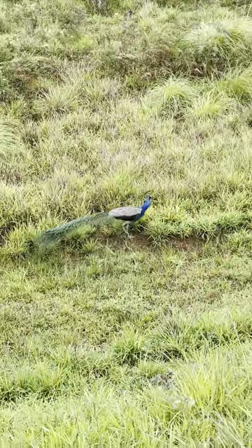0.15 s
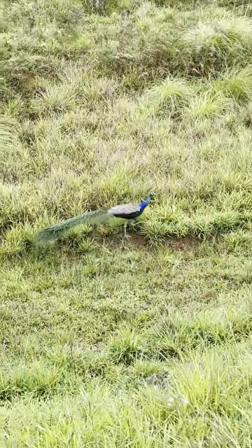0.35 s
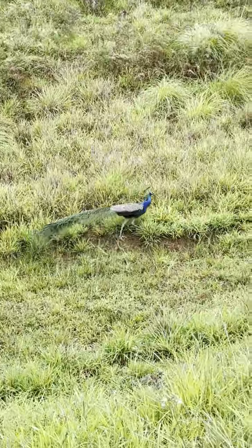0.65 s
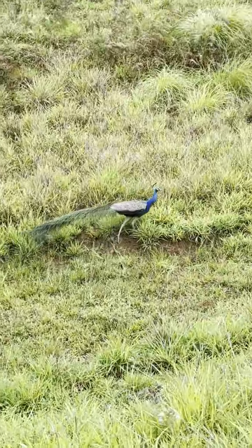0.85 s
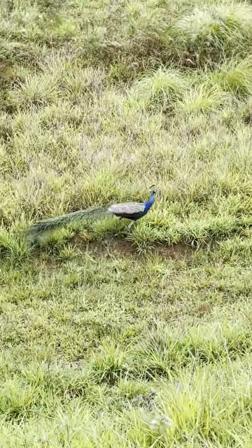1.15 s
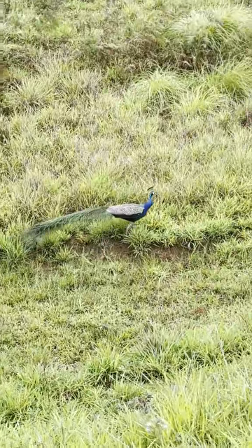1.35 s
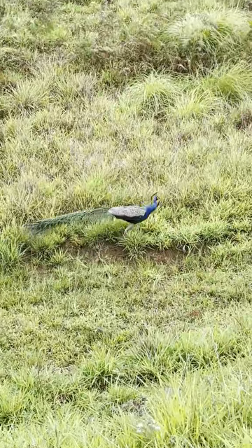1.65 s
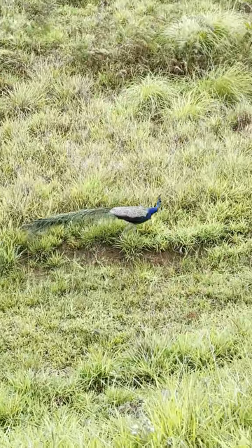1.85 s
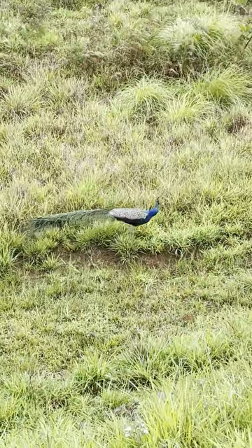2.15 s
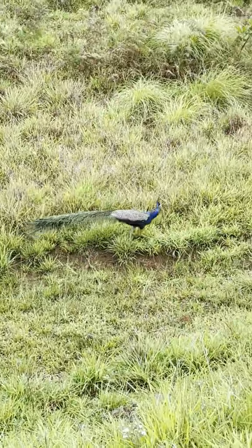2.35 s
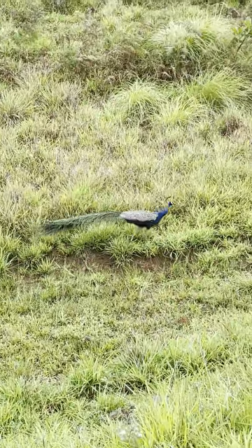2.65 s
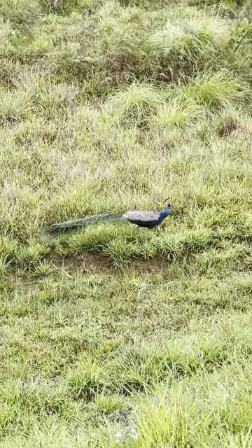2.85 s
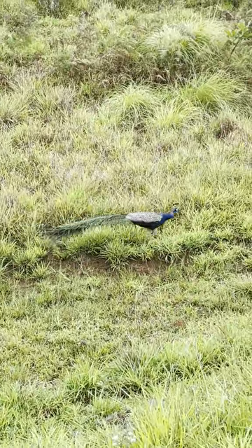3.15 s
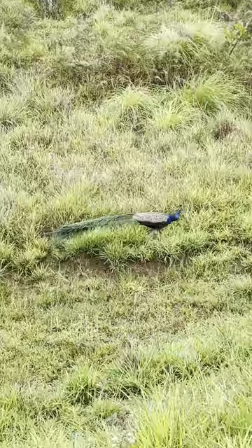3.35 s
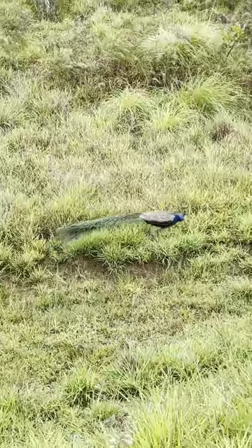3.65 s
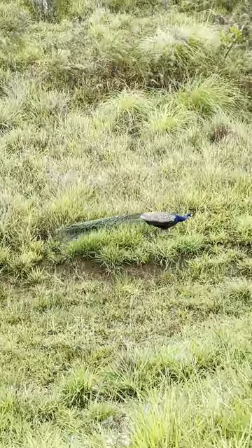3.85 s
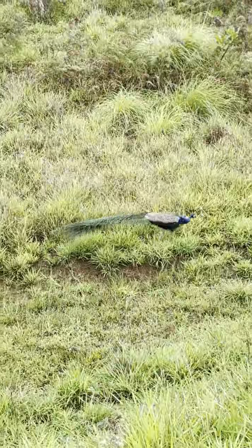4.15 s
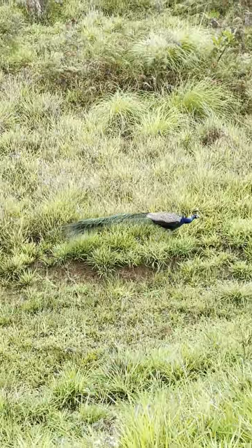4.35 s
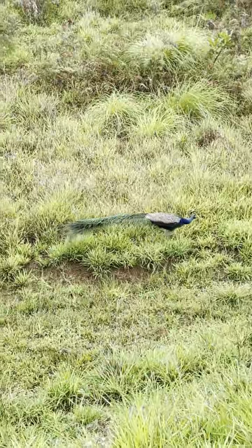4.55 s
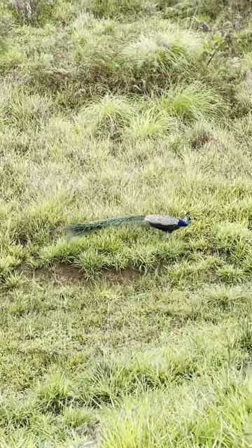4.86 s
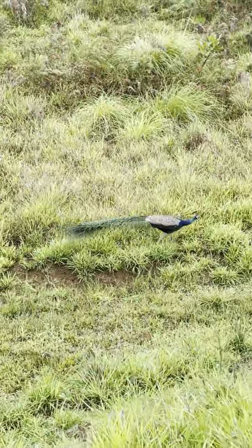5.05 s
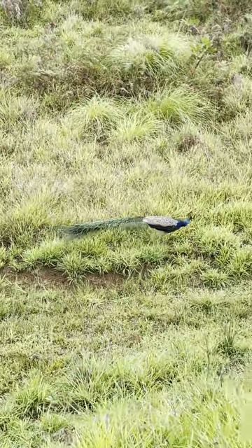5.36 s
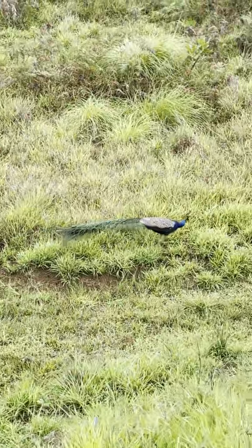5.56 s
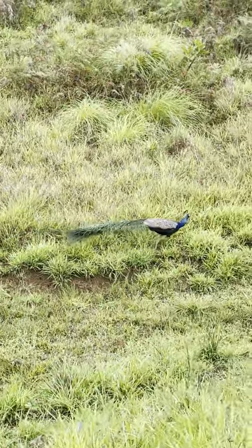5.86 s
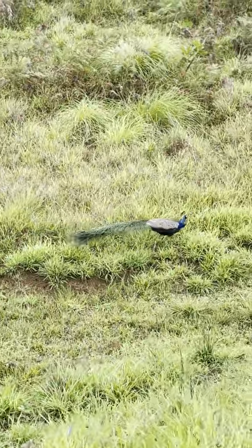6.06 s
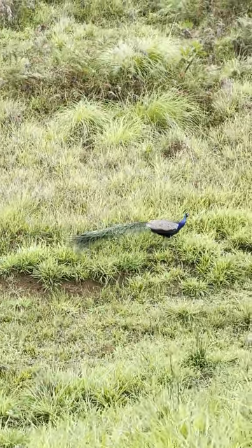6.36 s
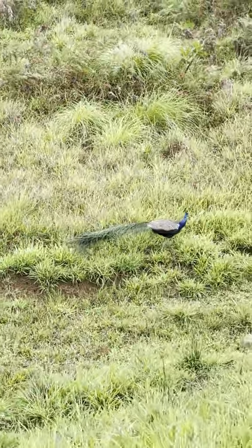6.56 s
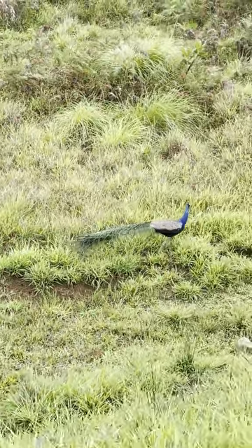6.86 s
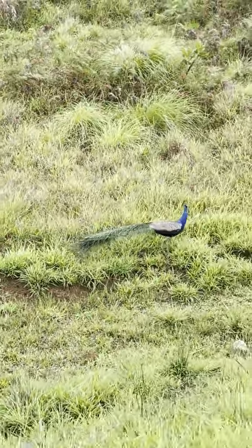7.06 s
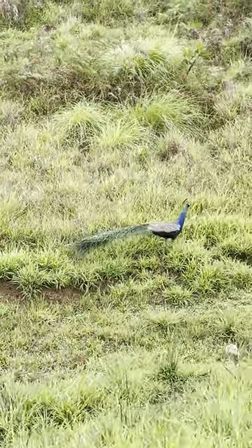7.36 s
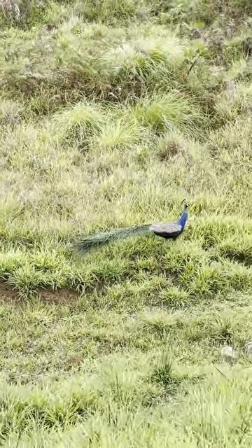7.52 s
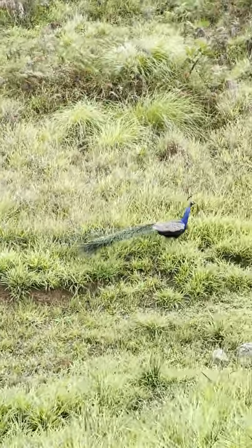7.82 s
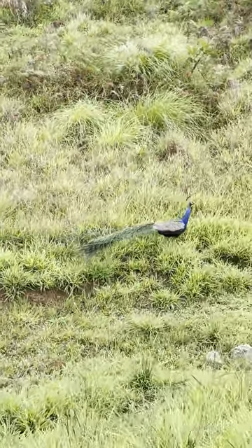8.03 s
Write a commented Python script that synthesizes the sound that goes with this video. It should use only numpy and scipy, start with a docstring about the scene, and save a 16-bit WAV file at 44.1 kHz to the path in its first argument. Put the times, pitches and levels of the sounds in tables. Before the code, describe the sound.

Outdoors in a grassy field, a small engine thumps and ticks at idle near the microphone. It is switched off with a click, and loose metal rattles briefly as it stops. Then it is much quieter: crickets and far insects, runs of faint raspy calls, and the soft knocks and cloth rustle of someone moving. A latch snaps midway, while a faint whistle slides upward until the end.

```python
"""An engine stops in a meadow

A one-cylinder engine idles close by: gas pulses ring its exhaust pipe and valve impacts ring its casing.
Switched off, it coasts to rest; loose sheet metal rattles in its modes and later a latch snaps.
Crickets, far insects and raspy calls emerge, with the rustles and dull knocks of someone shifting,
light ticks, and a thin whistle that climbs in pitch, as of air through a shrinking gap."""
import sys
import numpy as np
from scipy import signal
from scipy.fft import rfft, irfft
from scipy.io import wavfile
from scipy.ndimage import uniform_filter1d

SR = 44100
rng = np.random.default_rng(int(sys.argv[2]) if len(sys.argv) > 2 else 0)


def file_out(sig):
    """Save sig as 16-bit WAV at sys.argv[1]."""
    # one column per channel
    cols = np.atleast_2d(sig).T
    # limit, then scale
    lim = np.clip(cols, -1, 1)
    pcm = np.round(lim * 32767).astype(np.int16)
    wavfile.write(sys.argv[1], SR, pcm)


N = 361179
TIME_S, BIN_HZ = np.arange(N) / SR, np.arange(N // 2 + 1) * SR / N
SWITCH_OFF_S, AT_REST_S = 1.85, 3.0
CUTOFF_HZ = 16150

# loudness of the meadow background: time_s, hiss_db, chorus_db
MEADOW_LEVELS = [(2.75, -71, -73), (2.96, -71, -75), (3.31, -68, -70), (3.87, -71, -72.5),
                 (4.58, -67.5, -67), (4.73, -67.5, -68.5), (5.25, -70.5, -69.5), (5.81, -69.5, -68),
                 (6.04, -67.5, -68), (6.31, -68.5, -68), (6.61, -68, -67), (7.3, -67, -67),
                 (7.43, -65, -64), (8.19, -68.5, -67)]
# meadow background, faint distant air below and insect hiss above: frequency_hz, density_db
MEADOW_SPECTRUM = [(350, -21), (700, -22.5), (1100, -19), (1400, -18.5), (1760, -12.5), (2650, 1),
                   (3170, -5.5), (3790, -6.5), (5070, -13), (6060, -4), (6850, -25.5), (7600, -51),
                   (8300, -31), (9000, -14), (9650, -11.5), (10400, -26), (11200, -32), (12500, -34),
                   (15800, -39)]
# narrow bands of the insect chorus: centre_hz, width_hz, relative_db
CHORUS_BANDS = [(2735, 20, 0), (2660, 28, -4), (2990, 25, -9)]
# runs of raspy calls: first_s, last_s, call_count, first_relative_db, last_relative_db
RASP_RUNS = [(3.4, 4.42, 2, -56, -61), (4.93, 5.24, 3, -68, -61), (5.43, 6.3, 6, -58, -59),
             (6.45, 6.93, 4, -55.5, -54), (7.13, 7.62, 4, -59, -61), (7.81, 8.13, 3, -55, -55)]
# cricket bouts: first_end_s, last_end_s, chirp_count, chirp_length_s, first_relative_db, last_relative_db
LOW_CRICKET_BOUTS = [(.13, .55, 3, .12, -67, -70), (.71, 3.13, 13, .12, -69, -73),
                     (3.36, 5.55, 12, .13, -72, -69.5), (5.72, 6.64, 6, .09, -72, -74),
                     (6.83, 7.55, 5, .11, -74, -73), (7.75, 8.12, 3, .13, -70, -70)]
HIGH_CRICKET_BOUTS = [(.18, 2.5, 15, .08, -72, -74), (2.69, 3.32, 5, .1, -75, -75),
                      (3.55, 3.94, 3, .1, -74, -73), (4.1, 4.95, 6, .09, -73, -78),
                      (5.15, 6.6, 9, .08, -81, -81), (6.8, 7.5, 5, .08, -78, -77)]
# low rumble of moving air: time_s, level_db
WIND_LEVELS = [(2.3, -76), (3.0, -74), (3.3, -77), (3.6, -73), (3.95, -78), (4.5, -68), (5.05, -75),
               (5.6, -77), (6.0, -75), (6.6, -74.5), (7.0, -70), (7.6, -70), (8.19, -69.5)]
# loudness of low noise (engine rumble, the metal clank's tail, then rustling): time_s, level_db
LOW_NOISE_LEVELS = [(2.3, -52.5), (2.41, -75), (2.5, -41.5), (2.6, -55.5), (2.78, -71.5), (3.04, -81),
                    (3.4, -81), (3.8, -81.5), (4.07, -69), (4.36, -68), (4.71, -69.5), (4.95, -68),
                    (5.24, -74.5), (5.5, -74), (5.66, -74), (5.82, -78), (5.99, -62), (6.12, -71.5),
                    (6.3, -64.5), (6.73, -70.5), (7.02, -64), (7.7, -66), (8.19, -64)]
# spectra of the low noise and the dull bursts: frequency_hz, density_db
LOW_NOISE_SPECTRUM = [(71, -43), (120, -7.5), (190, 0.5), (323, 0.5), (433, -4), (511, -0.5), (837, -10.5),
                      (1120, -16.5), (1760, -16.5), (2000, -13.5), (2600, -32), (4400, -120)]
BURST_SPECTRUM = [(380, 4), (500, 8), (900, 7.5), (990, 3), (1050, -38)]
# dull noisy body of the metal clank, then quieter scuffs: start_s, length_s, level_db
DULL_BURSTS = [(2.439, 0.09, -48), (2.52, 0.06, -48), (2.583, 0.353, -71.5), (3.378, 0.096, -71),
               (3.735, 0.032, -68.5), (3.854, 0.11, -73.5), (4.207, 0.22, -73), (4.492, 0.087, -74),
               (4.697, 0.079, -64.5), (4.984, 0.06, -65), (5.628, 0.13, -72.5), (5.905, 0.2, -78),
               (6.098, 0.39, -73.5), (6.71, 0.14, -75), (7.018, 0.18, -74), (7.34, 0.25, -74),
               (7.66, 0.21, -77.5), (7.93, 0.35, -69.5)]
# dull knocks, soft thuds, light ticks and thin high ticks: start_s, peak_db, centre_hz
DULL_KNOCKS = [(4.165, -55.5, 342), (4.387, -49.5, 343), (4.423, -55, 335), (4.556, -54, 357),
               (4.647, -52.5, 195), (4.7, -45, 505), (4.844, -52.5, 218), (4.898, -43.5, 330),
               (4.992, -53, 295), (5.063, -52.5, 192), (5.595, -53.5, 313), (5.655, -49, 304),
               (5.717, -52.5, 284), (5.898, -54.5, 598), (5.96, -56, 302), (6.256, -46.5, 514),
               (6.335, -56.5, 570), (6.442, -57, 513), (6.545, -50.5, 400), (6.788, -56, 536),
               (6.945, -50, 474), (6.955, -45, 510), (7.178, -48, 195), (7.433, -53, 535), (7.5, -58, 453)]
SOFT_THUDS = [(2.723, -53, 41.5), (2.744, -52.5, 55.4), (2.82, -53, 63), (3.35, -57.5, 71),
              (3.43, -60.5, 54.5), (3.639, -59, 55.7), (4.388, -56, 87), (4.63, -61, 55),
              (7.093, -65, 82.5), (7.505, -52.5, 62.3), (7.59, -55, 71), (8.139, -52.5, 55.6)]
LIGHT_TICKS = [(1.8208, -32.5, 1110), (1.824, -37, 2200), (2.4695, -27, 2250), (3.0924, -53, 2660),
               (3.1557, -56.5, 1450), (3.156, -46.5, 2980), (4.548, -50, 3600), (4.642, -52, 4300),
               (4.9024, -54, 1990), (4.99, -59, 1695), (5.4313, -49.5, 2540), (5.89, -51.5, 2720),
               (5.9703, -50.5, 3000), (6.038, -57, 3000), (6.2068, -49, 2500), (6.335, -55.5, 1500),
               (6.668, -56, 1590), (7.2758, -40.5, 2076), (7.277, -43, 3600), (7.3617, -51, 3480),
               (7.421, -49.5, 2300), (7.422, -52, 3380), (7.497, -55, 1500), (7.5355, -50, 2310)]
HIGH_TICKS = [(2.0318, -45.5, 9800), (2.118, -64, 12900), (2.181, -64, 10400), (7.277, -52, 10400),
              (7.362, -54, 10400), (7.422, -57, 11250)]
# course of the whistle: time_s, pitch_hz, level_db, octave_relative_db
WHISTLE_COURSE = [(4.18, 850, -90, -30), (4.25, 888, -80, -30), (4.39, 970, -73, -30),
                  (4.42, 1048, -80, -30), (4.45, 1300, -94, -20), (4.55, 1747, -86, -20),
                  (4.64, 2070, -67.5, -25), (4.68, 2250, -78, -25), (4.8, 2860, -92, -20),
                  (4.88, 3200, -75, -25), (4.915, 3330, -76, -32), (4.95, 3530, -65, -31),
                  (4.98, 3630, -81, -25), (5.04, 3900, -77, -16), (5.11, 4090, -82, -12),
                  (5.14, 4130, -90, -10), (5.23, 4060, -74, -14), (5.28, 4230, -76, -17),
                  (5.5, 4700, -73, -2), (5.56, 4890, -82, -1), (5.63, 5000, -75.5, 0), (5.78, 5110, -77, 2),
                  (5.85, 5440, -72, -10), (5.91, 5770, -70, -7), (6.04, 5760, -72, -6),
                  (6.08, 6050, -72, -3), (6.12, 6300, -70, -10), (6.18, 6200, -68, -8),
                  (6.23, 6420, -76, -6), (6.34, 6370, -73, -4), (6.39, 6750, -81, 1), (6.44, 6500, -74, -3),
                  (6.47, 6720, -75, -5), (6.51, 6560, -73, -5), (6.58, 6900, -76, -5),
                  (6.61, 6900, -76, -6), (6.68, 7130, -79, -5), (6.71, 7280, -80, -24),
                  (6.86, 8130, -74, -16), (7.1, 8100, -78, -25), (7.18, 7570, -72, -20),
                  (7.26, 8200, -81, -30), (7.3, 8900, -73, -30), (7.35, 9340, -70, -30),
                  (7.42, 8540, -79, -30), (7.61, 8250, -77, -30), (7.79, 9500, -63, -30),
                  (7.87, 9900, -69, -30), (7.89, 9900, -63, -30), (7.93, 11400, -80, -30),
                  (7.945, 10200, -92, -30), (7.955, 10400, -59.5, -30), (7.975, 10600, -71, -30),
                  (7.995, 10100, -64.5, -30), (8.01, 11200, -75, -30)]
# tone an octave below the whistle's opening: time_s, level_db
SUBHARMONIC_LEVELS = [(4.4, -100), (4.46, -76), (4.56, -76), (4.61, -80), (4.65, -100)]
# contacts of a switch and a latch: start_s, level_db, t60_s, treble_db
SNAP_CONTACTS = [(1.8228, -21.5, 0.029, 6), (4.694, -31.5, 0.12, -13), (4.7079, -27.5, 0.093, 7.5),
                 (4.7214, -25, 0.09, -9), (4.732, -40, 0.21, 2.5), (4.7494, -53, 0.059, 15)]
# spectrum of a snap: frequency_hz, density_db
SNAP_SPECTRUM = [(88, -13), (150, -10), (254, -5.5), (430, -12), (727, -29), (850, -15), (1160, -33),
                 (1550, -20), (4120, -12.5), (4540, -10), (6450, -16), (7530, -43), (9520, -19),
                 (14300, -37), (15800, 1.5)]
# contacts of the loose metal part: start_s, level_db, t60_s, treble_db, body_db
METAL_CONTACTS = [(2.438, -41, 0.097, -8, 0), (2.466, -15.5, 0.044, -2.5, 0.5), (2.484, -20, 0.055, -6, -8),
                  (2.5, -14.5, 0.052, -21, -15), (2.518, -16, 0.032, -15, -7), (2.531, -26, 0.062, -10, 7),
                  (2.537, -25.5, 0.069, -9, 2), (2.557, -31.5, 0.085, -10, 0), (2.575, -40.5, 0.16, -1, 2),
                  (2.607, -37, 0.061, -6, 7), (2.628, -43, 0.065, -7, -4), (2.643, -42, 0.05, -12, -2),
                  (2.697, -46, 0.05, -16, 19), (2.808, -57, 0.055, -9, 2)]
# modes of that part: frequency_hz, gain_db, t60_s
METAL_MODES = [(460, -17, 0.057), (850, -2.5, 0.046), (1380, -8, 0.025), (1624, 6.5, 0.069),
               (2073, 2.5, 0.031), (2250, 0, 0.026), (2720, 5, 0.031), (3200, -10, 0.047),
               (4300, -14, 0.028), (4650, -4, 0.025), (6200, -23, 0.03)]
# noise of the engine's running parts: time_s, rumble_db, whirr_db
RUNNING_LEVELS = [(0.0, -44, -53), (0.8, -44, -53), (1.06, -45.5, -53), (1.25, -44, -52.5),
                  (1.75, -43, -52.5), (1.99, -43, -54), (2.12, -45, -58.5), (2.26, -48.5, -60.5),
                  (2.52, -58, -62.5), (2.71, -62, -60.5), (2.94, -65, -68), (3.0, -81, -45)]
# spectra of the running parts: frequency_hz, density_db
RUMBLE_SPECTRUM = [(15, -29), (28, -21), (45, -3.5), (66, -17.5), (97, -4.5), (128, -19.5), (179, -20),
                   (352, -5), (429, -20.5), (474, -8.5), (618, -22), (682, -12.5), (919, -32), (1300, -47),
                   (1690, -75), (2860, -120)]
WHIRR_SPECTRUM = [(590, 0), (1000, 1.5), (1330, -7.5), (1450, -9.5), (1760, -8.5), (2090, -3), (2270, -4.5),
                  (3070, -4), (3600, -11.5), (6270, -17), (7460, -27.5), (8280, -18.5), (12500, -31),
                  (14200, -45), (15800, -58)]
# valve strikes ahead of each exhaust beat: start_s, relative_db
VALVE_STRIKES = [(0.002, -37), (0.112, -34), (0.205, -36.5), (0.311, -34.5), (0.413, -35.5), (0.534, -35.5),
                 (0.636, -32.5), (0.735, -37), (0.838, -37.5), (0.934, -36), (1.05, -38), (1.15, -37),
                 (1.248, -40), (1.349, -34), (1.452, -34), (1.551, -41), (1.661, -36), (1.768, -35.5),
                 (1.867, -35.5), (1.991, -34), (2.153, -38)]
# modes of the engine casing and the exhaust pipe: frequency_hz, width_hz, gain_db
CASING_MODES = [(342, 23, -6), (547, 60, -20), (682, 68, -3), (913, 23, -1), (1434, 56, -7),
                (2077, 37.6, 1.5), (2410, 120, -10.5), (3010, 240, -13), (3340, 190, -13.5),
                (4490, 170, -24.5), (6060, 300, -33)]
PIPE_MODES = [(62.9, 22.7, -7), (89.8, 23.1, -3.5), (124.4, 33.3, -11), (362, 83, -5.5)]
# exhaust beats, one per engine cycle: start_s, level_db
EXHAUST_BEATS = [(0.03, -25.5), (0.139, -23.5), (0.237, -26.5), (0.346, -24), (0.447, -33), (0.561, -24.5),
                 (0.666, -23), (0.767, -22.5), (0.866, -24), (0.973, -24.5), (1.078, -23.5), (1.179, -23),
                 (1.28, -22.5), (1.377, -24.5), (1.481, -24.5), (1.581, -27), (1.692, -24.5), (1.797, -23),
                 (1.898, -23.5), (2.0228, -24), (2.201, -28)]
# microphone pair: frequency_hz, right_lead_rad, left_minus_right_db, scattered_share
PAIR_RESPONSE = [(40, .15, 0, .03), (100, .42, .6, .03), (300, 1.3, 0, .3), (600, 1.7, 0, .7),
                 (800, 1.6, -2, .8), (1100, 0, -1, .8), (1700, .5, -5, .6), (2100, .4, -2, .2),
                 (2900, -.4, -1, .07), (3600, 0, 0, .02), (6350, 0, 0, .02), (6800, -2.3, 0, .2),
                 (7300, -2.6, 0, .3), (8700, -2.0, 0, .3), (10400, 0, 0, .05), (11800, 0, 0, .05),
                 (13500, 2.5, 0, .4), (15800, 2.6, 0, .4)]


def amp(db):
    """Amplitude ratio of a level in decibels."""
    return 10 ** (np.asarray(db) / 20)


def unit_rms(x):
    """Normalisation to unit mean power."""
    return x / np.sqrt(np.mean(x ** 2) + 1e-20)


def in_time(rows):
    """Linear interpolation of a table's columns at every sample."""
    times, *columns = np.transpose(rows)
    return [np.interp(TIME_S, times, column) for column in columns]


def in_frequency(rows, column=1):
    """Interpolation of one column over log frequency, at every spectral bin."""
    rows = np.array(rows)
    return np.interp(np.log(BIN_HZ + 1), np.log(rows[:, 0] + 1), rows[:, column])


def add(out, start_s, piece):
    """Superposition of a short sound onto out."""
    i = round(start_s * SR)
    out[i:i + len(piece)] += piece[:N - i]


def drift(rate_hz):
    """Slow random modulation: low-passed noise of unit rms."""
    step, settling = 40, 2000
    pole = np.exp(-2 * np.pi * step * rate_hz / SR)
    noise = rng.standard_normal(N // step + settling + 2)
    slow = signal.lfilter([1], [1, -2 * pole, pole ** 2], noise)[settling:]
    return np.interp(np.arange(N) / step, np.arange(len(slow)), unit_rms(slow))


def resonate(x, hz, width_hz):
    """A damped two-pole resonator with unit peak gain."""
    radius = np.exp(-np.pi * width_hz / SR)
    feedback = [1, -2 * radius * np.cos(2 * np.pi * hz / SR), radius ** 2]
    return signal.lfilter(np.array([1, 0, -1]) * (1 - radius ** 2) / 2, feedback, x)


def filtered(x, order, hz, kind="low"):
    """A maximally flat low-pass or high-pass filter."""
    return signal.sosfilt(signal.butter(order, hz, kind, fs=SR, output="sos"), x)


def narrow_noise(hz, width_hz, skirt_hz):
    """Narrow-band noise of unit rms, from two resonators in cascade."""
    return unit_rms(resonate(resonate(rng.standard_normal(N), hz, width_hz), hz, skirt_hz))


def coloured(spectrum, flicker_db, rate_hz):
    """Spectrally shaped noise of unit rms, its octave bands modulated partly in common."""
    low_hz, high_hz = spectrum[0][0], spectrum[-1][0]
    in_band = (BIN_HZ > low_hz) * (BIN_HZ < high_hz)
    shaped = rfft(rng.standard_normal(N)) * amp(in_frequency(spectrum)) * in_band
    octave = np.log2((BIN_HZ + 1) / low_hz)
    common, out = drift(rate_hz), 0
    for k in range(int(np.log2(high_hz / low_hz)) + 2):
        band = irfft(shaped * np.clip(1 - abs(octave - k), 0, 1), N)
        out += band * amp(flicker_db * (common + drift(rate_hz)))
    return unit_rms(out)


def blow(start_s, db, t60_s, rise_s=0.0049):
    """Envelope of an impact: a fast rise, then exponential decay."""
    t, out = np.arange(SR // 2) / SR, np.full(N, 1e-12)
    add(out, max(start_s, 0), amp(db - 60 * t / t60_s) * (1 - np.exp(-t / rise_s)))
    return out


def taps(events, t60_s, q, click):
    """Impact excitation: a click and a decaying noise burst drive a resonance of quality q."""
    out, t = np.zeros(N), np.arange(SR // 4) / SR
    for start_s, peak_db, hz in events:
        burst = rng.standard_normal(len(t)) * amp(-60 * t / t60_s) + click * (t == 0)
        ring = resonate(resonate(burst, hz, hz / q), hz, 2 * hz / q)
        add(out, start_s, amp(peak_db) * ring / abs(ring).max())
    return out


def contact_noise(contacts, noise):
    """Brief contacts radiate decaying broadband bursts, each with its own share of treble."""
    dull, crest_db = filtered(noise, 2, 2500), 11
    return sum(blow(start_s, db - crest_db, t60_s) * (dull + amp(treble_db) * (noise - dull))
               for start_s, db, t60_s, treble_db, *_ in contacts)


def meadow_background():
    """Over faint distant air, many incoherent insects merge into a hiss and trembling narrow bands."""
    hiss_db, chorus_db = in_time(MEADOW_LEVELS)
    chorus = sum(amp(db + 1.4 * drift(11.5)) * narrow_noise(hz, width_hz, 500)
                 for hz, width_hz, db in CHORUS_BANDS)
    hiss = coloured(MEADOW_SPECTRUM, flicker_db=1.07, rate_hz=10)
    return amp(hiss_db + 0.5) * hiss + amp(chorus_db) * unit_rms(chorus)


def raspy_calls():
    """Amplitude-modulated noise: higher bands swell later, so each call sweeps upward."""
    swell = sum(amp(db - 17.5) * np.exp(-((TIME_S - s - 0.03) / 0.054) ** 2)
                for first_s, last_s, calls, first_db, last_db in RASP_RUNS
                for s, db in np.linspace((first_s, first_db), (last_s, last_db), calls))
    return sum(np.interp(TIME_S - delay_s, TIME_S, swell) * narrow_noise(hz, 630, 1000)
               for hz, delay_s in [(3350, 0.00042), (3800, 0.0048), (4300, 0.0099)])


def cricket(bouts, hz, swell_db, floor_db, roughness, strokes_per_s=63):
    """Stridulation: each wing stroke gives a pulse of falling pitch; pulses group into swelling chirps."""
    chirps = np.zeros(N)
    for first_s, last_s, count, length_s, first_db, last_db in bouts:
        for end_s, db in np.linspace((first_s, first_db), (last_s, last_db), count):
            progress = 1 + (TIME_S - end_s) / length_s
            chirps += amp(db + swell_db * (progress - 1.5)) * (progress > 0) * (progress < 1)
    other_singers = amp(floor_db + 3.3 * drift(4.4))
    envelope = amp(7) * (uniform_filter1d(chirps, size=900) + other_singers)
    stroke = np.cumsum(strokes_per_s * (1 + 0.0219 * drift(3.04))) / SR % 1
    pulses = np.sin(np.pi * np.clip(stroke / 0.87, 0, 1)) ** 1.16 * amp(0.5 * drift(30))
    pitch_hz = hz * (1 + 0.0037 * drift(3.5) + 0.0054 * drift(58.6) + 0.027 * (0.35 - stroke))
    tone = np.sin(2 * np.pi * np.cumsum(pitch_hz) / SR)
    scrape = roughness * (pulses + 0.33) * narrow_noise(hz, 390, 600)
    return envelope * (pulses * tone + scrape)


def wind():
    """Turbulent air at the microphones makes a low, gusting rumble."""
    gusts = amp(in_time(WIND_LEVELS)[0] + 2 * drift(6))
    return gusts * coloured([(18, -24), (50, -7), (80, -9), (160, -16)], flicker_db=0.5, rate_hz=6.8)


def low_noise():
    """Unevenly modulated noise: engine rumble, the metal clank's tail, then rustling cloth."""
    envelope = amp(in_time(LOW_NOISE_LEVELS)[0] + 1.4 * drift(10.3))
    return envelope * coloured(LOW_NOISE_SPECTRUM, flicker_db=2, rate_hz=20.6)


def dull_bursts():
    """Gated band-limited noise: the dull body of the metal clank, then quieter scuffs."""
    envelope, edge_s = 0, 0.027
    for start_s, length_s, db in DULL_BURSTS:
        inside_s = np.minimum(TIME_S - start_s, start_s + length_s - TIME_S)
        envelope += amp(db) * np.clip(inside_s / edge_s + 0.5, 0, 1)
    return envelope * coloured(BURST_SPECTRUM, flicker_db=2, rate_hz=24)


def knocks():
    """Heavily damped impacts of someone shifting; small ones fall at random once the engine rests."""
    noise_db, = in_time(LOW_NOISE_LEVELS)
    gaps, pitches = rng.random((60, 2)).T
    starts_s = AT_REST_S + np.cumsum((0.62 + 1.4 * gaps) / 4.6)
    small = [(s, noise_db[round(s * SR)] + 7.5, 220 * 3.14 ** pitch)
             for s, pitch in zip(starts_s, pitches) if s < TIME_S[-1]]
    dull = taps(DULL_KNOCKS + small, t60_s=0.08, q=2.3, click=9)
    return dull + taps(SOFT_THUDS, t60_s=0.086, q=3.3, click=35)


def ticks():
    """Light impacts excite high resonances that decay quickly."""
    light = taps(LIGHT_TICKS, t60_s=0.05, q=2.2, click=5)
    return light + taps(HIGH_TICKS, t60_s=0.033, q=5.7, click=3)


def whistle():
    """An aerodynamic tone, as of air in a shrinking gap: three harmonics and a brief subharmonic."""
    pitch_hz, db, octave_db = in_time(WHISTLE_COURSE)
    flutter = (pitch_hz / 8000) ** 1.5 * (0.012 * drift(35) + 0.004 * drift(9.6))
    phase = 2 * np.pi * np.cumsum(pitch_hz * (1 + flutter)) / SR
    tone = amp(in_time(SUBHARMONIC_LEVELS)[0]) * np.sin(phase / 2)
    for harmonic, share_db in enumerate([0, octave_db, -18], start=1):
        flicker_db = 5 * np.tanh(drift(54)) + 3 * drift(28)
        in_band = harmonic * pitch_hz < CUTOFF_HZ
        tone += amp(db + share_db + flicker_db) * np.sin(harmonic * phase) * in_band
    return np.sqrt(2) * tone * (TIME_S > WHISTLE_COURSE[0][0]) * (TIME_S < WHISTLE_COURSE[-1][0])


def snaps():
    """The abrupt contacts of a switch and a latch spread their energy over a wide band."""
    return contact_noise(SNAP_CONTACTS, coloured(SNAP_SPECTRUM, flicker_db=0, rate_hz=10))


def metal_rattle():
    """Modal vibration: each contact, an impulse plus noise, excites a sheet-metal part unevenly."""
    noise, rise_s = rng.standard_normal(N), 0.0015
    uneven_db = 0.92 * rng.standard_normal((len(METAL_CONTACTS), len(METAL_MODES)))
    force, ring = noise.copy(), 0
    for start_s, *_ in METAL_CONTACTS:
        add(force, start_s + rise_s, [amp(19)])
    for (hz, gain_db, ring_t60_s), offsets_db in zip(METAL_MODES, uneven_db.T):
        blows = 0
        for (start_s, db, t60_s, treble_db, body_db), offset_db in zip(METAL_CONTACTS, offsets_db):
            colour_db = treble_db * (hz > 2500) + body_db * (hz < 1200)
            blows += blow(start_s, db + offset_db + colour_db, t60_s, rise_s)
        ring += amp(gain_db) * resonate(blows * force, hz, width_hz=np.log(1000) / np.pi / ring_t60_s)
    clatter = filtered(contact_noise(METAL_CONTACTS, noise), 2, 900, "high")
    return filtered(ring + amp(-2.5) * clatter, 3, 5500)


def valves():
    """Structure-borne sound: valve impacts ring the casing; a lighter contact follows each fired beat."""
    seatings = [(s + 0.021, -47 + 2 * rng.standard_normal()) for s, _ in EXHAUST_BEATS if s < SWITCH_OFF_S]
    force, envelope = rng.standard_normal(N), 0
    for start_s, db in VALVE_STRIKES + seatings:
        add(force, start_s + 0.002, [amp(16)])   # hard first touch
        envelope += blow(start_s - 0.009, db, t60_s=0.075, rise_s=0.013)
        envelope += blow(start_s, db - 7, t60_s=0.016, rise_s=0.0019)
    return amp(21.5) * sum((-1) ** k * amp(gain_db) * resonate(envelope * force, hz, width_hz)
                           for k, (hz, width_hz, gain_db) in enumerate(CASING_MODES))


def treble_puffs():
    """Pulsed noise: a soft hiss follows each beat until just after the switch-off."""
    puffs = sum(blow(s + 0.012, -57 + 0.5 * rng.standard_normal(), t60_s=0.08, rise_s=0.0096)
                for s, _ in EXHAUST_BEATS if s < 1.95)
    return puffs * coloured([(8400, -21), (9200, 3), (12500, -8), (13900, -10)], flicker_db=0, rate_hz=10)


def running_parts():
    """Moving parts radiate broadband rumble and whirr; a droning band fades once firing stops."""
    rumble_db, whirr_db = in_time(RUNNING_LEVELS)
    rumble = amp(rumble_db) * coloured(RUMBLE_SPECTRUM, flicker_db=1.5, rate_hz=3.8)
    coasting = np.clip((TIME_S - SWITCH_OFF_S) / 0.13, 0, 1)
    rumble -= 0.74 * coasting * resonate(rumble, hz=312, width_hz=110)
    whirr = amp(whirr_db) * coloured(WHIRR_SPECTRUM, flicker_db=0.8, rate_hz=13)
    turning = np.clip((AT_REST_S - TIME_S) / 0.79, 0, 1)
    return turning * (rumble + whirr)


def exhaust():
    """Pipe resonance: each gas pulse rings the modes; unfired strokes ring longer and purer."""
    out, t = np.zeros(N), np.arange(SR // 4) / SR
    pulse = np.sin(np.pi * np.clip(t / 0.0043, 0, 1)) ** 2
    for start_s, db in EXHAUST_BEATS:
        unfired_db, damping = (-9, 0.66) if start_s > SWITCH_OFF_S else (0, 1)
        ring = 0
        for k, (hz, width_hz, gain_db) in enumerate(PIPE_MODES):
            build_up = resonate(resonate(pulse, hz, 10.7 * width_hz), hz, 1.06 * width_hz)
            gain = amp(gain_db + unfired_db * (k != 1))   # unfired strokes favour the second mode
            ring += (-1) ** k * gain * resonate(build_up, hz, damping * width_hz)
        valve_pop = amp(-12 + unfired_db) * np.roll(pulse, round(0.0046 * SR))   # leads the ring
        add(out, start_s - 0.003, -amp(db) * (ring / abs(ring).max() + valve_pop))
    return out


def microphone_pair(mid):
    """Phase and level differences, with some diffuse scatter, give a stereo image."""
    lead_rad = in_frequency(PAIR_RESPONSE, column=1)
    left_over_right = amp(in_frequency(PAIR_RESPONSE, column=2)) * np.exp(-1j * lead_rad)
    direct = (left_over_right - 1) / (left_over_right + 1)
    t, echo_t60_s = np.arange(SR // 4) / SR, 0.3
    echoes = rfft(rng.standard_normal(len(t)) * amp(-60 * t / echo_t60_s), N)
    scatter = in_frequency(PAIR_RESPONSE, column=3) * echoes / np.sqrt(np.mean(abs(echoes) ** 2))
    side = irfft(rfft(mid) * (direct + scatter), N)
    return np.array([mid + side, mid - side])


def scene():
    """Superposition: all sources add at one point and reach the microphone pair."""
    meadow = meadow_background() + raspy_calls() + wind()
    meadow += cricket(LOW_CRICKET_BOUTS, hz=7990, swell_db=4.4, floor_db=-87, roughness=0.26)
    meadow += cricket(HIGH_CRICKET_BOUTS, hz=8510, swell_db=5.4, floor_db=-85, roughness=0.24)
    nearby = low_noise() + dull_bursts() + knocks() + ticks() + whistle() + snaps() + metal_rattle()
    engine = valves() + treble_puffs() + running_parts() + exhaust()
    return microphone_pair(meadow + nearby + engine)


def record(dry):
    """Band limiting: a steep low-pass filter removes the highest treble."""
    return signal.sosfilt(signal.cheby2(12, 70, CUTOFF_HZ, fs=SR, output="sos"), dry)


dry = scene()
out = record(dry)
file_out(out)
```